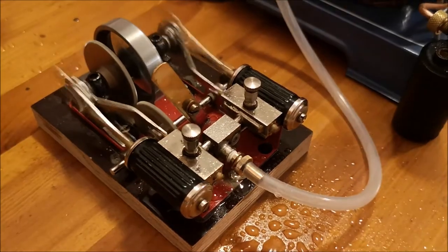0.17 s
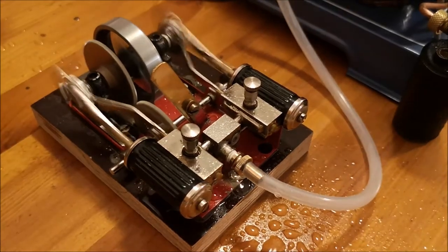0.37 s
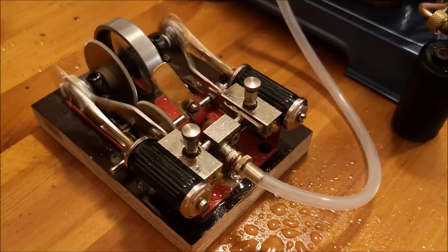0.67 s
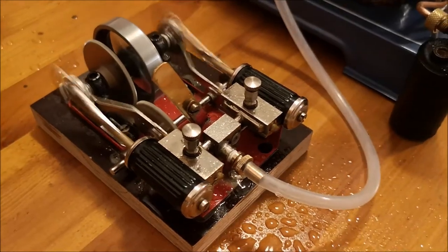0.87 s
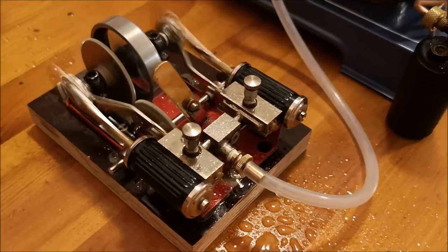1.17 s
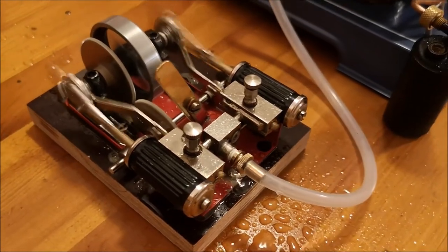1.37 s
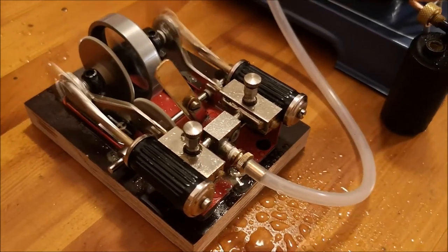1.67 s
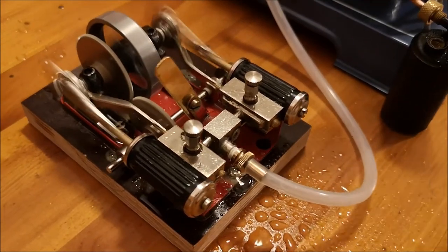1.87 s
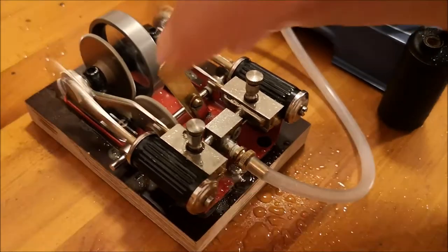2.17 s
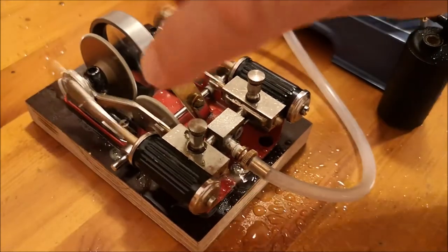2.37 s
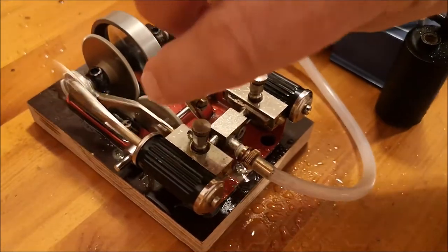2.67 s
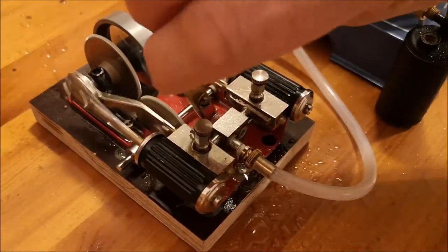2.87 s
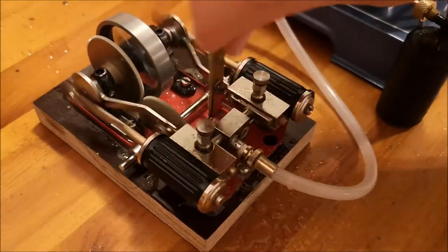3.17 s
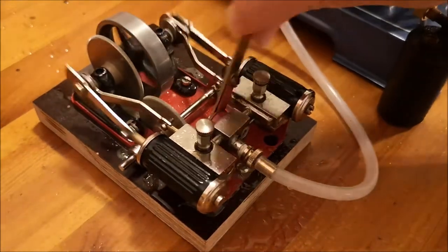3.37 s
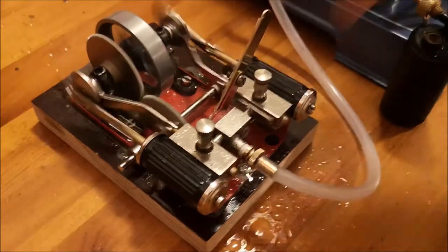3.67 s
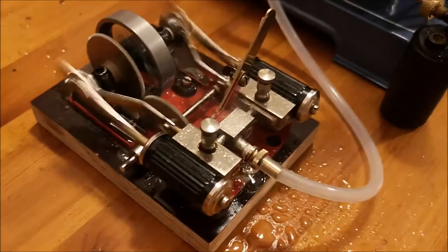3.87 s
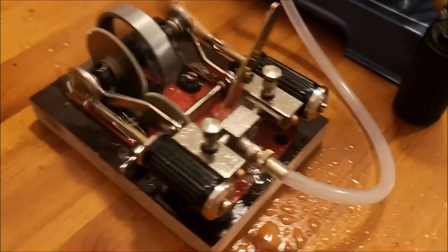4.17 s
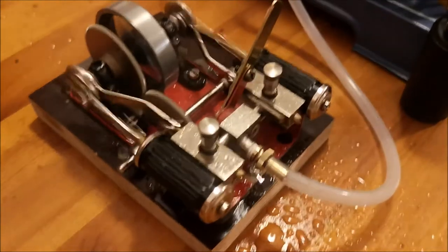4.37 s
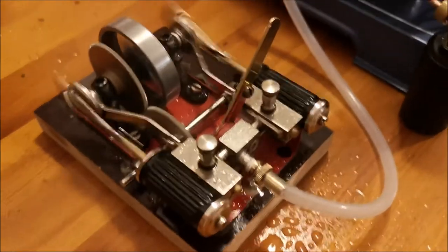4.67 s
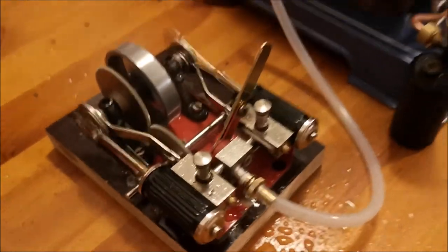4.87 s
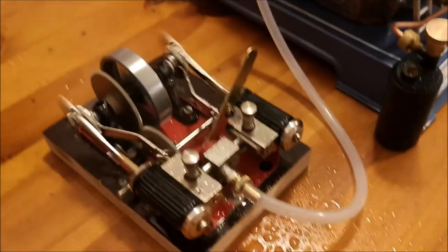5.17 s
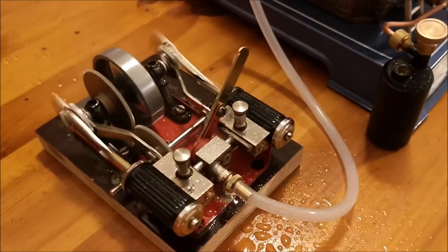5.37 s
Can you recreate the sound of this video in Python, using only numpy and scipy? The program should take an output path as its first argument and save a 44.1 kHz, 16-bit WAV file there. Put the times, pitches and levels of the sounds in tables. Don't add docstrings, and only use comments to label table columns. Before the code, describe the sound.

Close up in a quiet room, a miniature steam engine chatters quickly on its wooden base, its leaking steam finely chopped by the valves. Midway it stalls in a few fading ticks and a brief hush. A sharp surge of puffing steam follows, then slower, regular ticking and knocking under a stronger hiss. The handheld microphone picks up low thumps; the second channel is muffled and roomier.

```python
import sys
import numpy as np
from scipy import signal
from scipy.fft import rfft, irfft
from scipy.io import wavfile
from scipy.ndimage import uniform_filter1d

SR = 44100
rng = np.random.default_rng(int(sys.argv[2]) if len(sys.argv) > 2 else 0)


def file_out(sig):
    cols = np.atleast_2d(sig).T
    lim = np.clip(cols, -1, 1)
    pcm = np.round(lim * 32767).astype(np.int16)
    wavfile.write(sys.argv[1], SR, pcm)


def voltage_ratio(level):
    return 10 ** (np.asarray(level, float) / 20)


N = 243431
REVERSE_S = 3.44


def read(points, hz):
    f, value = np.transpose(points)
    return np.interp(np.log(hz + 1), np.log(f + 1), value)


def curves(rows, t):
    s, *columns = np.transpose(rows)
    return [np.interp(t, s, column) for column in columns]


def evened(x):
    return x / np.sqrt(np.mean(x ** 2) + 1e-20)


def drift(shape, size, axis=0):
    once = uniform_filter1d(rng.standard_normal(shape), size, axis)
    return evened(uniform_filter1d(once, size, axis))


def coloured(spectrum):
    gain = voltage_ratio(read(spectrum, np.fft.rfftfreq(N, 1 / SR)))
    return evened(irfft(rfft(rng.standard_normal(N)) * gain, N))


def resonance(hz, centre_hz, width_hz):
    return 1 / (1 + (2 * (hz - centre_hz) / width_hz) ** 2)


def room(x, t60):
    t = np.arange(SR // 4) / SR
    tail = rng.standard_normal(len(t)) * voltage_ratio(-60 * t / t60) * (t > .002)
    return signal.fftconvolve(x, tail / np.linalg.norm(tail))[:N]


# pitch_hz, level_db (per Hz)
AIR_COLOUR = [(150, -19), (250, -6), (660, -1), (800, -18), (2400, -11), (4300, -14), (8970, -3),
              (9940, -9), (15000, -8)]


def still_air():
    return voltage_ratio(-63 + 3) * coloured(AIR_COLOUR)


# time_s, level_db
GRIP_LEVEL = [(0, -43), (.8, -39), (1.05, -37.5), (1.55, -40), (2, -36), (2.5, -44), (3.1, -38),
              (3.69, -43), (3.92, -30.5), (4.2, -33.5), (4.66, -32.5), (4.89, -32.5), (5.08, -31),
              (5.52, -33)]
# pitch_hz, level_db (per Hz)
GRIP_COLOUR = [(7, -20), (14, 12), (36, 4), (60, -0.5), (110, -15), (160, -20.5), (250, -53), (400, -47),
               (700, -110)]
# time_s, peak_db, pitch_hz, lean_cycles (of the swing, late or early)
GRIP_THUMPS = [(0.123, -28.5, 78, 0.64), (1.406, -28, 64, 0.32), (3.281, -27.5, 75, -0.28),
               (4.213, -34, 116, 0.09), (4.348, -31.5, 131, 0.47), (1.664, -25.5, 27, -0.14),
               (1.839, -16.5, 52, 0.13), (2.094, -20, 53, 0.29), (2.882, -19, 56, 0.18),
               (3.195, -23, 26.4, 0.61), (3.785, -20, 20, 0.89), (3.84, -19, 34, -0.13),
               (3.884, -20, 42, 0.75), (4.6, -29, 44, 0.34), (3.871, -17, 211, -0.036),
               (3.879, -15.5, 84, -0.29), (4.285, -21, 33, 0.4), (4.482, -14, 61, 0.038),
               (4.536, -19, 54, 0.079), (4.648, -18, 39.4, 0.039), (4.766, -19, 36, 0.46),
               (4.752, -26.5, 106, -0.021), (4.862, -24.5, 26, -0.45), (5.088, -20, 36.2, 0.27),
               (5.143, -22.5, 42, -0.34), (5.278, -21.5, 42, 0.74)]


def grip():
    t = np.arange(N) / SR
    out = coloured(GRIP_COLOUR) * voltage_ratio(curves(GRIP_LEVEL, t)[0])
    for s, db, hz, lean in GRIP_THUMPS:
        first, last = max(int((s - .1) * SR), 0), int((s + .1) * SR)
        cycles = (t[first:last] - s) * hz
        swell = np.exp(-((cycles - 0.85 * lean) / 0.52) ** 2)
        out[first:][:len(cycles)] -= voltage_ratio(db) * np.cos(2 * np.pi * cycles) * swell
    return out


# time_s, angle_turns
CRANK = [(0, -1.68), (.3438, 6), (.6036, 12), (.8584, 18), (3.019, 69), (3.111, 71), (3.25, 71.5),
         (3.52, 71.56), (3.571, 72), (3.695, 73), (3.795, 74), (3.885, 75), (3.9689, 76), (4.109, 78),
         (4.2472, 80), (4.5066, 84), (5.0164, 92), (5.539, 100)]


def crank_turns(t):
    return curves(CRANK, t)[0]


# multiple (of crank speed), level_db, loudest_s, swell_db_per_s, fade_db_per_s
SHAFT_HUM = [(6, -55, 1.57, 19, 7.5), (7, -56.5, 1.3, 9, 5), (12, -54.5, 0.3, 9, 15),
             (15, -55.5, 0.57, 13, 1.5), (18, -57, 2.9, 10, 4)]


def hum():
    t = np.arange(N) / SR
    turns = uniform_filter1d(crank_turns(t), 4000, mode="nearest")
    waver_db = 2.5
    out = np.zeros(N)
    for multiple, db, top_s, swell_db, fade_db in SHAFT_HUM:
        waver = np.interp(t, np.linspace(0, N / SR, 600), drift(600, size=4))
        away_db = np.maximum(swell_db * (top_s - t), fade_db * (t - top_s))
        level = voltage_ratio(db + 5 + waver_db * waver - away_db)
        out += level * np.sin(2 * np.pi * round(multiple) * turns)
    return out * np.clip((3.2 - t) / 0.44, 0, 1)


# middle_s, half_length_s, pitch_hz, level_db, throb_db (per turn)
FRAME_STRAINS = [
    (3.35, .055, 267, -58, 0),
    (4.7, 0.41, 940, -54, 8),
]


def strains():
    t = np.arange(N) / SR
    throb = np.sin(2 * np.pi * crank_turns(t))
    out = np.zeros(N)
    for s, half, hz, db, throb_db in FRAME_STRAINS:
        swell = np.exp(-((t - s) / half) ** 4)
        out += voltage_ratio(db + throb_db * throb) * swell * np.sin(2 * np.pi * hz * t)
    return out


# pitch_hz, level_db (per Hz)
JET_FORWARD = [(500, -5.5), (1000, -5), (1500, -6.5), (2300, -3), (3500, -6.5), (4250, -7.5), (5400, -1.5),
               (6500, 0), (7600, 1.5), (9200, 0.5), (11200, -1.5), (12100, 2), (14500, 2.5), (15200, -7)]
JET_BACKWARD = [(500, -3.5), (1000, -1.5), (1510, -5.5), (2030, 0), (3700, -2), (4500, -3), (5200, -5),
                (6400, -4), (8000, -2), (9400, -3), (10000, -5), (11800, -7.5), (13100, -5.5),
                (15200, -13.5)]
# pitch_hz, width_hz, level_db
PORTS_FORWARD = [(7700, 700, 1), (9330, 500, 3.5), (10300, 500, 1.5), (13300, 700, 2.5)]
PORTS_BACKWARD = [(5780, 350, 4.5), (7400, 450, 1.5), (8750, 450, 1.5), (10400, 450, 1.5), (12800, 600, 2)]
# angle_turns, width_turns, level_db (at 8 kHz)
CUTS_FORWARD = [
    (.49, .12, -7),
    (.0, .15, -1),
]
CUTS_BACKWARD = [
    (-.27, .12, -4.5),
    (.19, .1, -2.5),
]


def leak_db(t, hz):
    turns = crank_turns(t)
    seated = np.clip(1 + (t - 3.98) / .1, .35, 1)

    def one_way(jet, ports, cuts, seated):
        colour = read(jet, hz) + sum(db * resonance(hz, f, width) for f, width, db in ports)
        for angle, width, db in cuts:
            past = ((turns - angle + .5) % 1 - .5) / width
            closed = np.exp(-np.where(past > 0, 3 * past, past) ** 2)
            colour = colour + seated * db * closed * (hz / 8000) ** .25
        return colour

    forward = one_way(JET_FORWARD, PORTS_FORWARD, CUTS_FORWARD, 1)
    backward = one_way(JET_BACKWARD, PORTS_BACKWARD, CUTS_BACKWARD, seated)
    return np.where(t < REVERSE_S, forward, backward)


# start_s, level_db
EXHAUST_PUFFS = [
    (3.55, 4.5),
    (3.602, 5.5),
    (3.68, 3),
    (3.705, 1.5),
    (3.73, 2),
    (3.76, 0),
    (3.79, 1.5),
    (3.832, 1),
    (3.849, -3.5),
    (3.872, 1.5),
]


def puffs_db(t):
    fade_s = 0.049
    return sum(db * (t > s) * np.exp(-abs(t - s) / fade_s) for s, db in EXHAUST_PUFFS)


def roar_db(t):
    coasting_db = 25 * (t - 3.034) + 130 * np.maximum(t - 3.32, 0)
    restart_db = 153 * (3.58 - t)
    stalled_db = np.maximum(np.minimum(coasting_db, restart_db), 0)
    return np.where(t < REVERSE_S, -44, -45) - stalled_db


# time_s, level_db
PRESSURE = [(0, -36), (1.1, -36.5), (1.45, -35), (1.7, -36.5), (2.6, -37), (3.1, -38.5), (3.14, -45.5),
            (3.22, -49.5), (3.25, -49.5), (3.39, -56), (3.425, -58), (3.455, -55), (3.505, -35.5),
            (3.53, -31.5), (3.57, -28), (3.6, -32), (3.75, -30.5), (3.87, -30.5), (4.32, -29), (5.52, -29)]


def steam():
    frames, hz = N // 64 + 9, np.fft.rfftfreq(256, 1 / SR)[None]
    t = np.arange(frames)[:, None] * 64 / SR
    hiss_db = curves(PRESSURE, t)[0]
    puffs = puffs_db(t)
    surge = np.exp(-((t - 3.62) / 0.14) ** 2)
    roar = roar_db(t) - hiss_db - 5.5 * surge + puffs
    fizz_db = np.maximum(-15 + 0.66 * (hiss_db + 31), -25)
    fizz_db += 1.8 * np.clip(2.4 - t, 0, 1) * (drift((frames, 1), size=14) - 2.2)
    db = leak_db(t, hz) + hiss_db
    db += (roar + 9) * np.clip((5500 - hz) / 1500, 0, 1)
    db += (fizz_db + 9) * np.clip((hz - 11000) / 1500, 0, 1)
    db -= 0.7 * np.maximum(-41 - hiss_db, 0) * np.clip((hz - 9700) / 400, 0, 1)
    db += puffs * (0.34 + 1.54 * resonance(hz, 1970, 290) + resonance(hz, 4740, 500))
    seeping = np.clip(np.minimum(t - 3.2, 3.66 - t) / 0.049, 0, 1)
    db += 4.5 * seeping * resonance(hz, 9300, 600)
    open_s = t - 3.47
    held_top = np.clip((hz - 6500 - 110000 * open_s) / 2500, 0, 1)
    db -= 18 * (t > REVERSE_S) * held_top * np.clip(open_s / 0.016, 0, 1)
    db += (1.1 - 0.1 * surge) * drift((frames, 1), size=5) + .7 * drift((frames, 1), size=30)
    db += 0.35 * evened(uniform_filter1d(drift((frames, 129), size=14), size=5, axis=1))
    noise = rng.standard_normal((frames, 129)) + 1j * rng.standard_normal((frames, 129))
    return voltage_ratio(-13) * signal.istft((noise * voltage_ratio(db)).T, nperseg=256, noverlap=192)[1][:N]


# time_s, knock_db, table_share_db (passed on to the table)
LOAD = [(0, -43.5, -4), (.8, -44, -8), (1.6, -41, -33), (2.15, -40.5, -16), (2.32, -40.5, -10),
        (2.5, -40, -14), (2.8, -37.5, -19), (3.1, -39.5, -3), (3.4, -37.5, -5), (3.55, -45, -14),
        (3.62, -50.5, -7), (3.85, -53, -18), (4.05, -36, -19), (4.9, -36.5, -14), (5.1, -38.5, -10.5),
        (5.52, -38.5, -9)]


def effort(t):
    knock_db, share_db = curves(LOAD, t)
    loose_db = -21.5
    tick_db = np.where(t < 3.12, -23 - t, np.where(t < REVERSE_S, loose_db, -27))
    return tick_db, -5 + 0 * t, knock_db, knock_db + share_db


# angle_turns, tick_db, tick_brightness_db, knock_db, thud_db
FORWARD = [
    (-.46, 0, -5, -20, -16),
    (-.2, -5, -1, 0, 0),
    (-.12, -1, 2.5, -14, -20),
    (.03, -30, 0, -5, -20),
    (.2, -8, -4, -14, -20),
    (.14, -30, 0, -20, 0),
]
BACKWARD = [
    (-.17, 0, -9, 0, 0),
    (-.005, -2, -1, -8, -6),
    (.16, -12, -4, -9, -10),
    (.45, -20, -6, -18, -7),
]
# time_s, tick_db, tick_brightness_db, knock_db, thud_db
DYING = [
    (3.187, 1, 2, -8, -8),
    (3.218, -6, -1, 0, -3),
    (3.224, -6, -1, -9, -9),
    (3.253, -11, -4, -9, -9),
    (3.27, -12, -6, -9, -9),
    (3.279, -14, -4, -10, -9),
    (3.297, -18, -6, -17, -12),
    (3.345, -30, 0, -16, -14),
]
# time_s, peak_db, brightness_db
SLAPS_FORWARD = [(0.0092, -24, -3.7), (0.0549, -21.5, -10), (0.1, -28, 6), (0.1153, -27, 1),
                 (0.1601, -25, 1), (0.2052, -27, -3), (0.2345, -27, -11), (0.2791, -27, -7),
                 (0.3232, -29.3, -5), (0.3671, -24, -8.7), (0.3817, -29, 0.1), (0.4108, -25, -10),
                 (0.454, -28, -5), (0.4969, -25, -11), (0.5408, -25, -6), (0.5838, -24.5, 0),
                 (0.6261, -28, -5), (0.7535, -27, -5.1), (0.8386, -26, -5.7), (0.8528, -25, 0),
                 (0.8913, -24, 0), (0.9372, -24.5, -3.1), (0.965, -26, -9), (1.1345, -26, -10.8),
                 (1.1773, -26, -4), (1.2196, -25, -6.1), (1.2343, -30, 2.1), (1.2616, -26, -1),
                 (1.2764, -29, -7), (1.304, -29, -6.5), (1.3189, -28, -6.5), (1.361, -31, -8.2),
                 (1.3892, -27, -4.7), (1.4315, -26, -4.5), (1.474, -32, -2.1), (1.4884, -31, -5),
                 (1.5308, -30, -8.2), (1.6429, -24, -3.5), (1.6575, -29, -8.0), (1.6996, -25.5, -10),
                 (1.7423, -27, -13.6), (1.7701, -25, -11), (1.7841, -27, 4), (1.8564, -27, -2.8),
                 (1.9407, -26, -7.6), (2.025, -26, -7.0), (2.0393, -31.8, -5.6), (2.0673, -23, -2.9),
                 (2.0814, -28, -5.4), (2.1233, -28, -10.4), (2.2768, -26.5, -6), (2.319, -29, -3.7),
                 (2.418, -27, 2), (2.4605, -25, 0), (2.6303, -26, 1), (2.6585, -27.5, 5), (2.7157, -26, 2),
                 (2.9991, -24.5, -4), (3.0585, -27, 2), (3.1048, -23, 2.5)]
SLAPS_BACKWARD = [(4.1691, -25, -12), (4.236, -31, -11), (4.302, -34, -6.0), (4.4317, -25, -8),
                  (4.4952, -24, -2), (4.5602, -23, -6.0), (4.6243, -26, -6.0), (4.6981, -25, -6.0),
                  (4.8144, -28, -11), (4.9419, -31.5, -6.0), (4.9519, -28, -6.0), (5.005, -31, -6.0),
                  (5.0697, -32, -9), (5.1448, -30.8, -6.0), (5.2, -35, -6.0), (5.3965, -29.7, -6.0)]


def blows():
    s, turns = np.transpose(CRANK)
    rows = []
    for k in range(-1, 72):
        rows += [(np.interp(k + angle, turns, s), *db) for angle, *db in FORWARD if k + angle < 71]
    for k in range(72, 100):
        rows += [(np.interp(k + angle, turns, s), *db) for angle, *db in BACKWARD]
    rows = np.array(rows + DYING)
    rows[:, 1:] += rng.standard_normal((len(rows), 4)) * [1.8, 3, .7, 1.2]
    rows[:, 0] += 0.0002 * rng.standard_normal(len(rows))
    rows[:, 1:] += np.transpose(effort(rows[:, 0]))
    slaps = np.array([(at + .0006, db + 2, bright_db, -90, -90)
                      for at, db, bright_db in [*SLAPS_FORWARD, *SLAPS_BACKWARD]])
    replaced = abs(rows[:, :1] - slaps[:, 0]).min(axis=1) < .003
    rows[:, 1] += np.where(replaced, -60, -4)
    return np.vstack([rows[rows[:, 0] < N / SR], slaps])


def rings(modes, rise_s):
    t = np.arange(SR // 6) / SR
    group = 1 if rise_s > .001 else 3
    swing = np.zeros(len(t))
    for k, (hz, db, t60) in enumerate(modes):
        swing += (-1) ** (k // group) * voltage_ratio(db - 60 * t / t60) * np.sin(2 * np.pi * hz * t)
    return swing * (1 - np.exp(-t / rise_s))


# pitch_hz, level_db, t60_s
ROD_MODES = [(3505, 1.5, 0.0074), (3107, -6.5, 0.006), (3760, -3, 0.0068), (2800, -7, 0.0056),
             (1950, -16, 0.028)]
LEVER_MODES = [(4950, 0, .007), (5600, -5, .005), (7000, -12, .004), (9300, -12, .004)]
BASE_MODES = [(596, 0, 0.052), (655, -5, 0.05), (725, -2, 0.045), (810, -7, 0.06), (942, -6.5, 0.075),
              (1005, -15, 0.07), (1188, -9.5, 0.06), (1276, -12, 0.055), (1385, -11, 0.065)]
TABLE_MODES = [(350, -1, 0.035), (430, -5.5, 0.026), (300, -8, 0.04), (496, -8, .04)]
ROD_PITCHES = (.92, 1, 1.05)
# time_s, lowest_mode_db, middle_modes_db, upper_modes_db
WARMING = [
    (0, -11, 1, 0),
    (.15, -3, -11, 0),
    (.55, -3, -1, -5),
    (.75, -3.5, -2, 0),
    (1.05, -5, -2, 0),
    (1.5, -4.5, -0.5, -5),
    (1.8, -1, -2.5, -3),
    (2.15, -5, 1, -2),
]
# time_s, lowest_mode_db, middle_modes_db, upper_modes_db
STROKES = [(2.206, -3, -4, -4), (2.248, 3, -4, -1.9), (2.29, 3, -15, -5), (2.333, 6.5, -5, -4),
           (2.375, 4.5, -6, 7), (2.417, -5, 0, 7), (2.46, 3, 0.5, -1.0), (2.502, -6, 2, 12),
           (2.545, 4, 1.7, -3), (2.587, -1, -1, 5), (2.629, 7.5, -8, 16), (2.672, 2, -1.9, 2),
           (2.714, 3.5, -1, 1), (2.756, -1, 2, 10), (2.799, 0, -1, 4), (2.841, -1, 1, 4),
           (2.883, 0, -10, -2.5), (2.926, 2.5, -1, -2.9), (2.968, -1, -10, -3), (3.011, 1, -18, 1),
           (3.056, -2, -8, 6), (3.102, -4.5, -9, 7), (3.551, 5, 1, -1), (3.607, -12, -3, -4.0),
           (3.694, 18, 5, 3), (3.795, 6, 8, -5), (3.955, 4, -5, -10), (4.027, 0, 1.5, 1),
           (4.097, -2, -2, 4.5), (4.166, 1, -0.2, 1), (4.235, 1, -1, 2), (4.301, 0, -2.5, 2),
           (4.366, 0, -13, 2), (4.431, 0.5, -5, 4), (4.496, 0, -6, 4), (4.559, -2, -6, 3),
           (4.623, -3, -6, 0), (4.687, -2, -1, 5), (4.751, -1, -8, 4), (4.814, -6, -1.5, 0),
           (4.878, -8, -5, 2), (4.942, -6, -3.6, 1), (5.006, -7, -1.8, -1), (5.071, -5, -0.5, 2),
           (5.136, -4, -1, 4), (5.201, -4, -2, 1), (5.267, -11, -1.5, 2), (5.332, -4, 0, -1.6),
           (5.397, -5, -1, 3), (5.463, 0, 0, 3)]


def linkage():
    s, tick_db, bright_db, knock_db, thud_db = blows().T
    t = np.arange(N) / SR
    tick_work, _, knock_work, thud_work = effort(t)
    turning = np.interp(t, [3.1, 3.39, 3.42, 3.53, 3.56], [1, 1, .08, .08, 1])
    stall_db = 35 * np.maximum(t - 2.8, 0) * (t < REVERSE_S)
    low_db, middle_db, top_db = curves(WARMING + STROKES, s)
    top_db = top_db + np.where(s < REVERSE_S, -20 + 3 * s, 1.5)

    def sing_db(at):
        return 6.5 - 6 * np.minimum(((at - 0.98) / 0.83) ** 4, 10)

    def struck(modes, rise_s, blow_db, rattle_db):
        drive = voltage_ratio(rattle_db) * turning * rng.standard_normal(N)
        np.add.at(drive, (s * SR).astype(int), voltage_ratio(blow_db))
        return signal.oaconvolve(drive, rings(modes, rise_s))[:N]

    pin = rng.choice(len(ROD_PITCHES), len(s), p=(.2, .6, .2))
    pin = np.where(s > REVERSE_S, np.maximum(pin - 1, 0), pin)
    out = np.zeros(N)
    for k, pitch in enumerate(ROD_PITCHES):
        rod = [(hz * pitch, db, t60) for hz, db, t60 in ROD_MODES]
        out += struck(rod, 0.00048, np.where(pin == k, tick_db, -90), tick_work - 51 - stall_db)
    out += struck(LEVER_MODES, .0002, tick_db + bright_db, tick_work - 50 - stall_db)
    out += struck(BASE_MODES[:1], .004, knock_db + 12.5 + low_db, knock_work - 44)
    out += struck(BASE_MODES[1:4], .0031, knock_db + 9.5 + middle_db, knock_work - 40)
    out += struck(BASE_MODES[5:6], .003, knock_db + 11.5 + sing_db(s), knock_work - 26 + sing_db(t))
    out += struck(BASE_MODES[4:], .027, knock_db + 14 + top_db, knock_work - 37)
    out += struck(TABLE_MODES, .003, thud_db + 11.5, thud_work - 40)
    return out


# pitch_hz, level_db
FAR_SHADE = [(30, .1), (100, .4), (180, 1), (380, -1), (700, -10.5), (1290, -10), (2100, -12), (3500, -20),
             (5000, -25.5), (7000, -25), (9300, -20), (10500, -25), (14000, -24), (15000, -30)]
# pitch_hz, lag_radians
FAR_LAG = [(0, .08), (950, 4.8), (12600, 42.5), (22050, 73)]
# pitch_hz, share (0-1)
FAR_DIRECT = [(60, .995), (150, .92), (700, .94), (1100, .4), (2400, .58), (5000, .6), (9300, .62),
              (14000, .45)]


def far_microphone(x):
    hz = np.fft.rfftfreq(N, 1 / SR)
    direct = np.clip(read(FAR_DIRECT, hz), 0, 1)
    late = np.exp(-1j * np.interp(hz, *np.transpose(FAR_LAG)))
    mixed = direct * late * rfft(x) + np.sqrt(1 - direct ** 2) * rfft(room(x, .35))
    return irfft(mixed * voltage_ratio(read(FAR_SHADE, hz)), N)


def scene():
    engine = still_air() + hum() + strains() + steam() + linkage()
    near = engine + voltage_ratio(-16) * room(engine, .15) + grip()
    return np.array([near, far_microphone(near)])


def low_pass(x):
    return signal.sosfilt(signal.butter(12, 15250, fs=SR, output="sos"), x)


def record(dry):
    edge = signal.firwin(511, 15230, window=("kaiser", 9), fs=SR)
    mix = signal.oaconvolve(dry, edge[None], "same")
    return low_pass(mix)


dry = scene()
out = record(dry)
file_out(out)
```